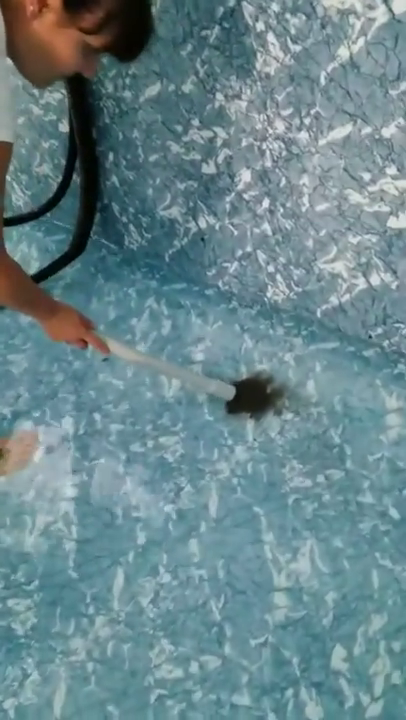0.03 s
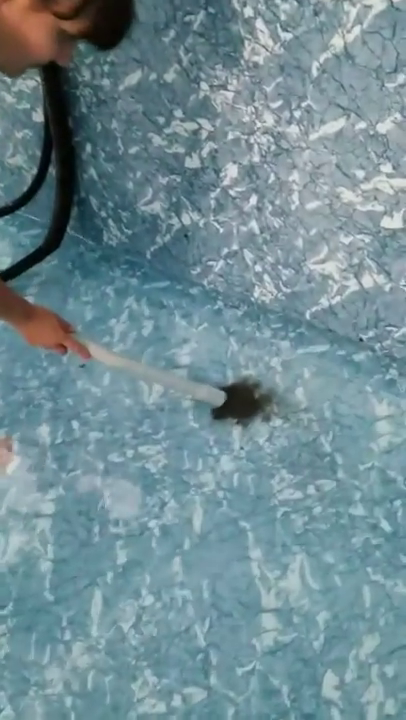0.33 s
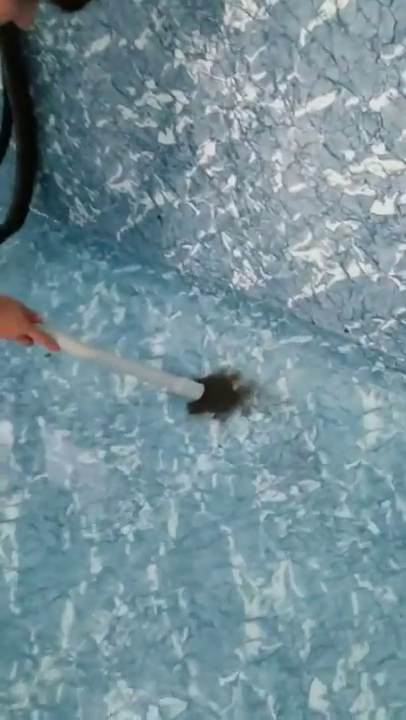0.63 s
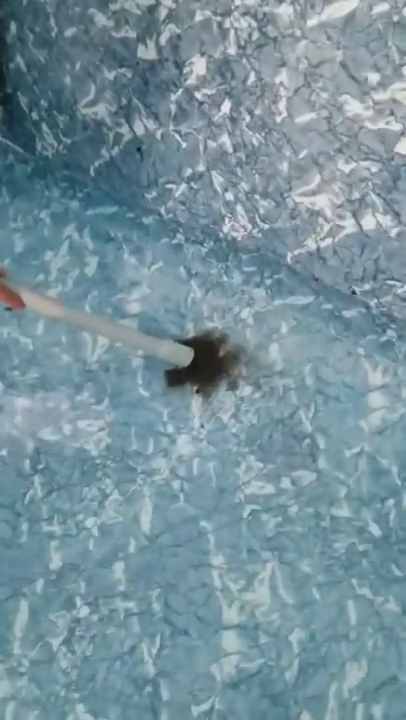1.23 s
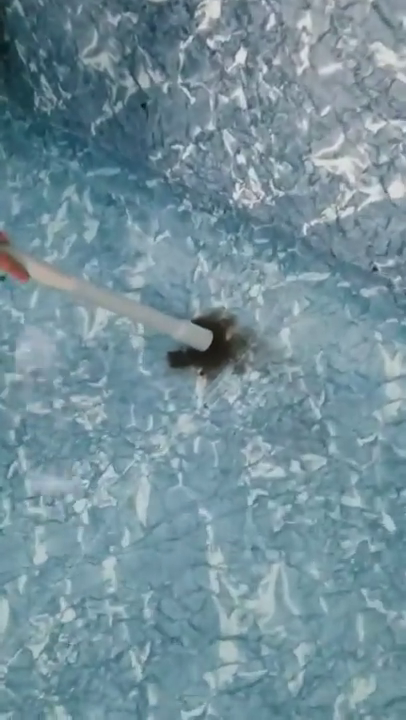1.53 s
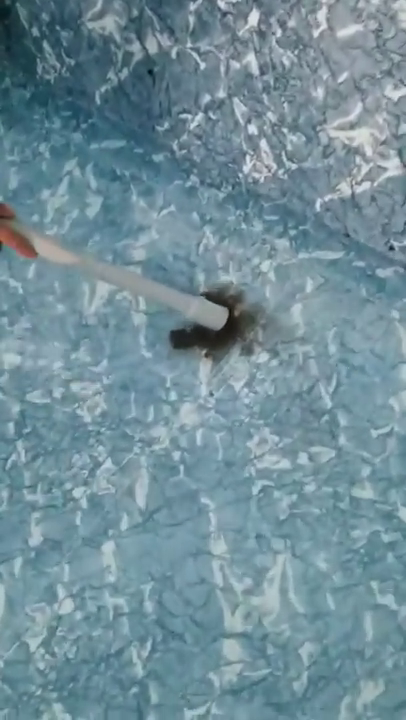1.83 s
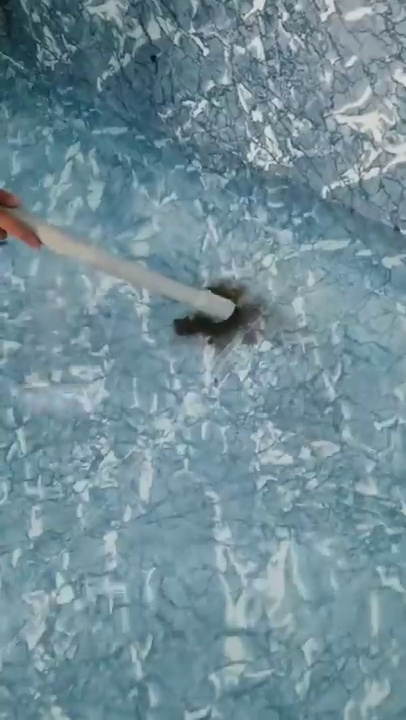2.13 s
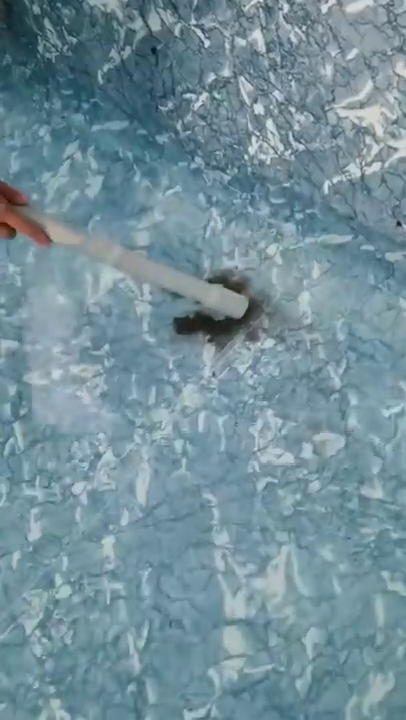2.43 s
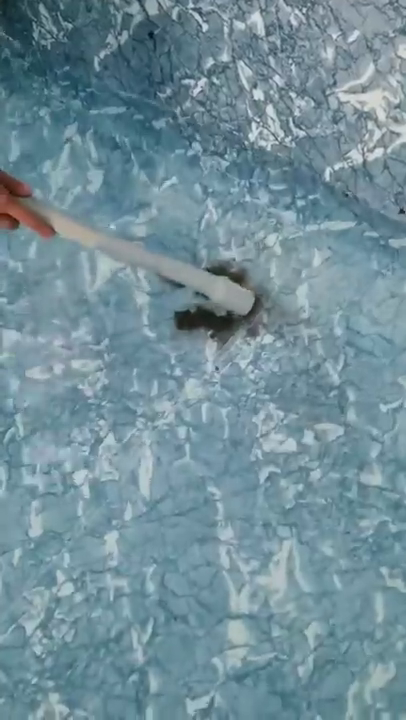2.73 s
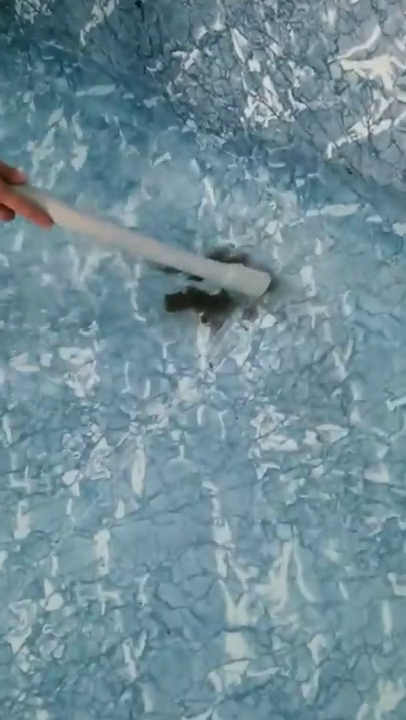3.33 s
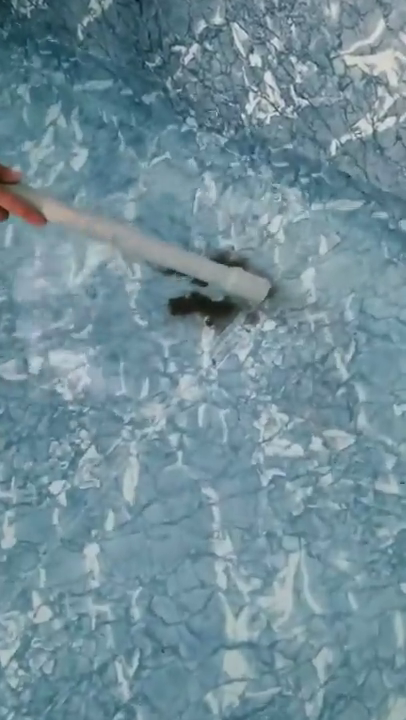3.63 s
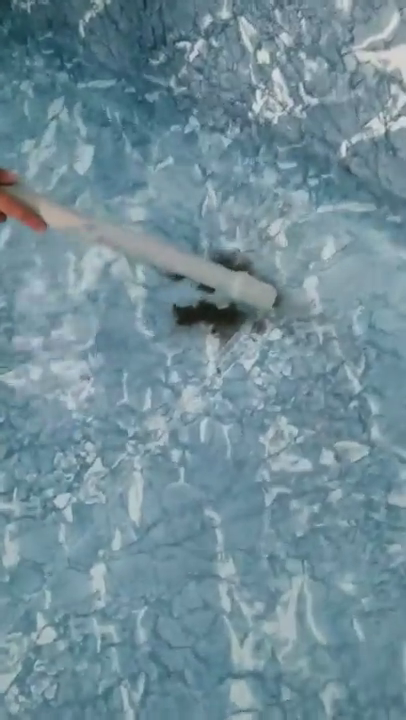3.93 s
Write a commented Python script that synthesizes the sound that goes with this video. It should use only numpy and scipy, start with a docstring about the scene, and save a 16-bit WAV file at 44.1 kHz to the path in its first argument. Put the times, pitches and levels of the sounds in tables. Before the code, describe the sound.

Steady hiss of water sucked through a pool pipe, over soft bumps on the microphone.

```python
"""Swimming pool: a suction pipe draws water and dirt from the floor, heard mostly on the left.
Turbulent flow makes a steady hiss and excites the pipe's resonances; grit and air spit in the pipe,
and a few soft laps of water sound as gliding bubble tones.
Fingers shift on the camera next to the right microphone: dull knocks, short rubs, a low rumble."""
import sys
import numpy as np
from scipy import signal
from scipy.fft import rfft, irfft
from scipy.io import wavfile
from scipy.ndimage import uniform_filter1d

SR = 44100
rng = np.random.default_rng(int(sys.argv[2]) if len(sys.argv) > 2 else 0)


def to_wav(s):
    """Save 16-bit WAV."""
    ch = np.atleast_2d(s).T  # columns
    pcm = np.round(np.clip(ch, -1, 1) * 32767)  # PCM
    wavfile.write(sys.argv[1], SR, pcm.astype(np.int16))


N = 176400
T, HZ = np.arange(N) / SR, np.fft.rfftfreq(N, 1 / SR)
VALLEY_HZ = 8500  # dip between the two bright bands of hiss and spits


def amp(db):
    """Decibels to gain."""
    return 10 ** (np.asarray(db) / 20)


def unit_rms(x):
    """Scale to rms 1."""
    return x / np.sqrt(np.mean(x ** 2) + 1e-20)


def spectrum(points):
    """Gain per bin from (freq_hz, gain_db) points, log-frequency axis."""
    hz, db = np.transpose(points)
    return amp(np.interp(np.log(HZ + 1), np.log(hz + 1), db))


def curve(points, t=T):
    """Control curve at times t."""
    return np.interp(t, *np.transpose(points))


def noise(gain):
    """Unit-rms noise shaped by a gain per bin."""
    return unit_rms(irfft(rfft(rng.standard_normal(N)) * gain, N))


def clicks(per_s, spread_db):
    """Random clicks of uneven size."""
    signs = (rng.random(N) < per_s / SR) * rng.choice([-1, 1], N)
    return signs * amp(spread_db * np.minimum(rng.exponential(1, N), 3))


def shifted(x, shift_hz):
    """Shift all frequencies by a time-varying offset."""
    return (signal.hilbert(x) * np.exp(2j * np.pi * np.cumsum(shift_hz) / SR)).real


def stereo(x, left_db=0, right_db=0):
    """Place a sound by channel gain."""
    return np.array([amp(left_db) * x, amp(right_db) * x])


def grip():
    """The grip on the camera rumbles unevenly and creaks."""
    level = [(0, -41), (.42, -37), (.55, -48.5), (.7, -39.5), (1.1, -40.5), (1.75, -40.5), (2.05, -46),
             (2.55, -45), (2.9, -39.5), (3.15, -38.5), (3.25, -36.5), (3.7, -33.5), (4, -34.5)]  # grip rumble: time_s, level_db
    colour = [(15, -6.5), (35, -2.5), (75, -0.5), (130, -11.5), (250, -24), (500, -29), (1200, -45),
              (4000, -75)]  # rumble spectrum: freq_hz, relative_db
    creak_band = (HZ * np.exp(-HZ / 102)) ** 2  # peak at 102 Hz
    creaks = unit_rms(irfft(rfft(clicks(per_s=28, spread_db=3.5)) * creak_band, N))
    lumps = unit_rms(amp(3.5 * noise(HZ < 14)))
    return amp(curve(level)) * lumps * (noise(spectrum(colour)) + amp(-6) * creaks)


def push(t, hz, skew_rad):
    """One rounded, lopsided push and release."""
    u = 2 * np.pi * hz * t
    return 1.27 * (np.sin(skew_rad) * (u ** 2 - 1) - np.cos(skew_rad) * 2 * u) / (1 + u ** 2) ** 2


def knocks(case_hz=90, case_decay_s=0.0061, wobble_s=0.011):
    """A finger pushes and releases the case between two weaker wobbles; the case rings briefly."""
    hits = [(0.116, -25, 55), (.184, -17, 149), (.25, -24, 138), (.299, -24.5, 130), (0.324, -30, 149),
            (0.337, -22, 83), (0.467, -27.5, 102), (0.794, -21, 110), (.819, -21.5, 57.5), (0.979, -32, 64),
            (1.282, -24.5, 166), (1.293, -20, 68), (1.372, -14.5, 73), (2.181, -29, 80), (2.636, -25, 77.4),
            (2.839, -22.5, 123), (2.925, -23, 104), (3.06, -23.5, 116), (3.223, -20, 94),
            (3.251, -21.5, 59.5), (3.294, -22.5, 170), (3.476, -19.5, 99), (3.499, -22.5, 151),
            (3.539, -22, 95), (3.556, -21, 119), (3.575, -19.5, 139), (3.627, -21, 108),
            (3.652, -19.5, 122), (3.709, -17.5, 105), (3.734, -15.5, 126), (3.752, -18, 89.5)]  # finger knocks: time_s, level_db, pitch_hz
    out = np.zeros(N)
    for (time_s, db, hz), (skew, before, after) in zip(hits, rng.standard_normal((len(hits), 3))):
        near = abs(T - time_s) < 0.08
        t = T[near] - time_s
        age_s = np.maximum(t, 0)
        wobble = push(t + wobble_s * (1 + abs(before) / 2), hz, before)
        wobble += push(t - wobble_s * (1 + abs(after) / 2), hz, after)
        ring = -amp(-2.5) * np.sin(2 * np.pi * case_hz * age_s) * np.exp(-age_s / case_decay_s)
        out[near] += amp(db) * (push(t, hz, 0.92 * skew) + amp(-12.5) * wobble + ring)
    rebound = 1j * HZ / (1j * HZ + 39.6)  # high-pass
    soft_finger = 1 / np.sqrt(1 + (HZ / 390) ** 6)  # low-pass
    return irfft(rfft(out) * rebound * soft_finger, N)


def rubs(rise_s=0.009, decay_s=0.015, slip_hz=290.5, slip_share=0.54):
    """A finger slides on the case: scraping noise and an unsteady stick-slip tone."""
    slides = [(3.294, -34.5), (3.841, -14.5), (3.876, -31), (3.984, -35)]  # finger rubs: peak_s, level_db
    colour = [(30, -19), (120, -6), (250, 2), (520, -7), (900, -20.5), (1500, -28), (8000, -60)]  # scrape spectrum: freq_hz, relative_db
    envelope = sum(amp(db) * np.exp(-np.maximum((peak_s - T) / rise_s, (T - peak_s) / decay_s))
                   for peak_s, db in slides)
    pitch_hz = slip_hz * (1 + 0.26 * noise(HZ < slip_hz / 2))
    slip = unit_rms(np.sin(2 * np.pi * np.cumsum(pitch_hz) / SR))
    scrape = noise(spectrum(colour))
    return envelope * (np.sqrt(slip_share) * slip + np.sqrt(1 - slip_share) * scrape)


def laps(log_width=0.27):
    """Each lap of water is a soft cluster of bubble tones gliding in pitch."""
    events = [(0.082, 0.22, -43, 1080, -0.1), (0.742, 0.17, -46.5, 830, 0.34),
              (0.956, 0.078, -39.5, 1262, .25), (1.054, 0.205, -51, 638, .1),
              (1.962, 0.357, -51, 450, 0.18), (2.924, 0.42, -46.5, 1267, 0.12)]  # water laps: start_s, length_s, level_db, centre_hz, rise_octaves
    out = np.zeros(N)
    for start_s, length_s, db, centre_hz, rise_octaves in events:
        progress = np.clip((T - start_s) / length_s, 0, 1)
        envelope = np.interp(progress, [0, 0.18, 1], [0, 1, 0])
        bubbles = noise(np.exp(-(np.log((HZ + 1) / centre_hz) / log_width) ** 2))
        glide_hz = centre_hz * (2 ** (rise_octaves * (progress - 0.5)) - 1)
        out += amp(db) * envelope * shifted(bubbles, glide_hz)
    return stereo(out, right_db=-18.5)


def spits(rise_s=0.0014, fizz_decay_s=0.0015):
    """Grit and air in the pipe: short bursts, full or thin, over a fizz of tiny clicks."""
    events = [(2.124, -21.5, 0.011, 2), (2.284, -21, 0.0071, -8), (2.6137, -21.5, 0.0046, -11),
              (3.3023, -12, 0.0054, 6), (3.402, -12, 0.0024, -3)]  # bursts: start_s, level_db, decay_s, body_db
    colour = [(1400, -15), (1880, 1), (2600, -9), (4000, -13), (6100, 5.5), (7600, -7), (9000, -9),
              (10700, 12.5), (12500, -3), (15800, -14)]  # burst and fizz spectrum: freq_hz, relative_db
    bursts, gain = np.zeros(N), spectrum(colour)
    for start_s, db, decay_s, body_db in events:
        age_s = np.maximum(T - start_s, 0)
        envelope = np.minimum(age_s / rise_s, 1) * np.exp(-np.maximum(age_s - rise_s, 0) / decay_s)
        bursts += amp(db) * envelope * noise(gain * amp(body_db * (HZ < VALLEY_HZ)))
    click_tail = rng.standard_normal(N) * np.exp(-T / fizz_decay_s)
    fizz = unit_rms(irfft(rfft(clicks(per_s=260, spread_db=4.5)) * rfft(click_tail) * gain, N))
    return stereo(bursts + amp(-38) * fizz, right_db=-50)


def pipe_mode(hz, width_hz, db, swell, shift_hz=0):
    """One flow-excited pipe resonance, wavering in pitch."""
    ring = noise(1 / (1 + (2 * (HZ - hz) / width_hz) ** 2))
    waver_hz = 19.96 * noise(HZ < 16)
    return amp(db + curve(swell)) * shifted(ring, shift_hz + waver_hz)


def pipe_resonances():
    """Four resonances come and go as the nozzle moves; the upper two drift."""
    # swell of each resonance: time_s, gain_db
    low = [(0, -2), (.72, -6), (1.03, -18), (1.5, -5), (2.02, 3.5), (2.31, -7), (2.55, 1), (3.27, -5),
           (3.31, 4), (3.92, 0), (3.96, 8.5)]
    second = [(0, 1.5), (.72, -0.5), (1.05, -10), (1.35, 2), (4, 0)]
    mid = [(0, -15), (.45, -7), (1.05, -16), (1.16, -4.5), (1.299, -15), (2.5, -31), (3.58, -9.5),
           (3.64, -2.5), (4, -5)]
    high = [(0, -2.5), (.9, -9), (1.6, -2), (3.55, -1.5), (3.73, 2.5), (4, -6)]
    drift = [(0, -30), (1, -150), (1.9, 90), (3.1, -69), (3.7, 88.5)]  # highest resonance: time_s, shift_hz
    left = pipe_mode(hz=1854, width_hz=120, db=-42, swell=low)
    left += pipe_mode(hz=2231, width_hz=95, db=-46.5, swell=second)
    left += pipe_mode(hz=3230, width_hz=92, db=-36.5, swell=mid, shift_hz=-33 * T)
    left += pipe_mode(hz=6390, width_hz=440, db=-33.5, swell=high, shift_hz=curve(drift))
    right = amp(-15.5) * pipe_mode(hz=1854, width_hz=120, db=-42, swell=low)
    return np.array([left, right])


def turbulence(colour, flow_top_hz=6500, treble_hz=8800, valley_width_hz=1400):
    """Turbulent flow noise: patches drift, all bands flutter together, the treble has its own level."""
    flow = [(0, -42), (.35, -43.5), (.42, -42), (.57, -44), (1.2, -43.5), (1.35, -41.5), (2.2, -42),
            (3.1, -43), (4, -40.5)]  # flow strength: time_s, relative_db
    treble = [(0, -36), (1.05, -37), (1.39, -33), (2.48, -34.5), (2.59, -31.5), (2.73, -34.5), (3.15, -35),
              (3.42, -33.3), (3.52, -35.5), (4, -34)]  # treble strength: time_s, relative_db
    valley = [(0, 2.5), (.7, -3), (1, 0), (2.7, 0), (3.1, -2.5), (3.5, 1), (4, -0.5)]  # band at VALLEY_HZ: time_s, gain_db
    frames, hz = N // 64 + 9, np.fft.rfftfreq(256, 1 / SR)
    t = np.arange(frames) * 64 / SR
    patches = uniform_filter1d(rng.standard_normal((frames, 129)), size=60, axis=0)
    patches = unit_rms(uniform_filter1d(patches, size=7, axis=1))
    flutter = unit_rms(uniform_filter1d(rng.standard_normal(frames), size=4))
    swell = unit_rms(uniform_filter1d(rng.standard_normal(frames), size=45))
    treble_band = np.clip((hz - flow_top_hz) / (treble_hz - flow_top_hz), 0, 1)
    flow_band = (1 - treble_band) * np.minimum(hz / 4000, 1)
    valley_band = np.exp(-((hz - VALLEY_HZ) / valley_width_hz) ** 2)
    flow_db, treble_db = curve(flow, t), curve(treble, t)
    gain_db = np.outer(flow_db - flow_db.mean(), flow_band)
    gain_db += np.outer(treble_db - treble_db.mean(), treble_band)
    gain_db += np.outer(curve(valley, t), valley_band)
    gain_db += patches + (0.4 * flutter + 0.36 * swell)[:, None]
    bands = signal.stft(noise(spectrum(colour)), nperseg=256, noverlap=192)[2]
    bands *= amp(gain_db[:bands.shape[1]].T)
    return unit_rms(signal.istft(bands, nperseg=256, noverlap=192)[1][:N])


def suction_hiss():
    """Water drawn through the pipe hisses steadily, far louder on the left."""
    # hiss spectrum per side: freq_hz, relative_db
    left_colour = [(70, -22), (250, -24), (420, -18.5), (800, -25.5), (1500, -17), (1900, -9.5),
                   (2800, -11.5), (4600, -9.5), (5200, -9.5), (6000, -2.5), (6550, -2.5), (7100, -12),
                   (7600, -17), (8700, -11.5), (9400, -10.5), (10150, -2.5), (10850, -3), (11500, -7.5),
                   (12800, -14.5), (14500, -21)]
    right_colour = [(100, -20), (1100, -21.5), (1500, -9.5), (2300, -5), (3300, -11.5), (8700, -14.5),
                    (14800, -13), (15500, -28)]
    return np.array([amp(-27) * turbulence(left_colour), amp(-53) * turbulence(right_colour)])


def scene():
    """Suction and water on the left, fingers on the right."""
    pool = pipe_resonances() + suction_hiss() + spits() + laps()
    fingers = grip() + knocks() + rubs()
    return pool + stereo(fingers, left_db=-33)


def record(dry):
    """Steep low-pass at 15.8 kHz."""
    lowpass = signal.firwin(701, 15800, window=("kaiser", 9), fs=SR)
    return signal.oaconvolve(dry, lowpass[None], "same")


dry = scene()
out = record(dry)
to_wav(out)
```